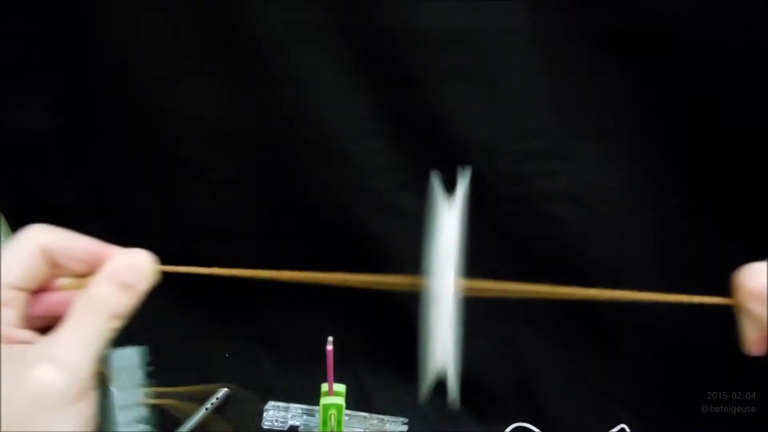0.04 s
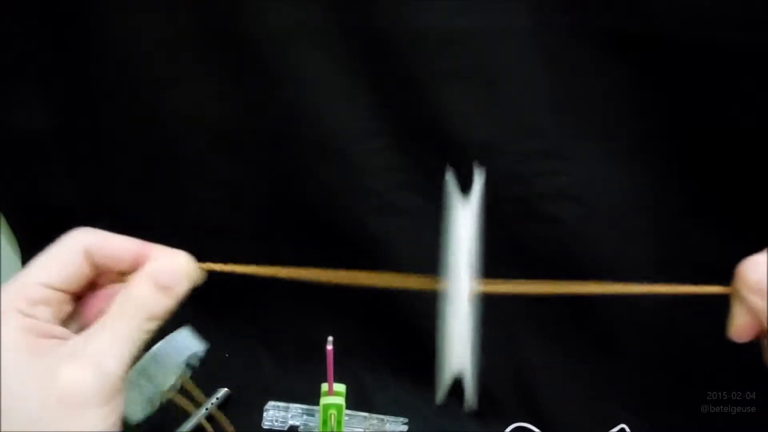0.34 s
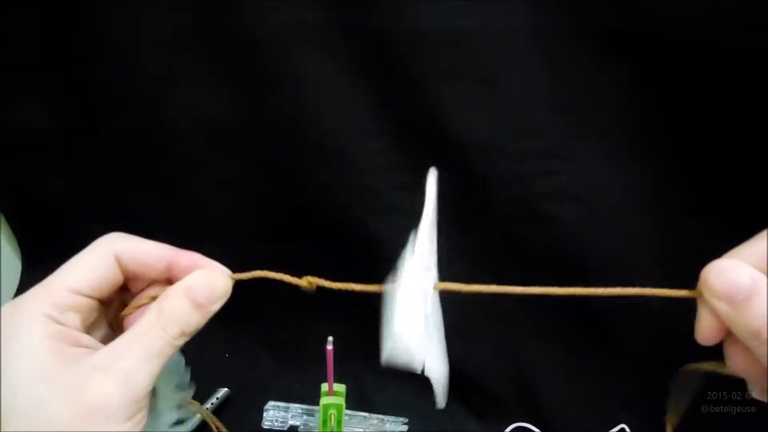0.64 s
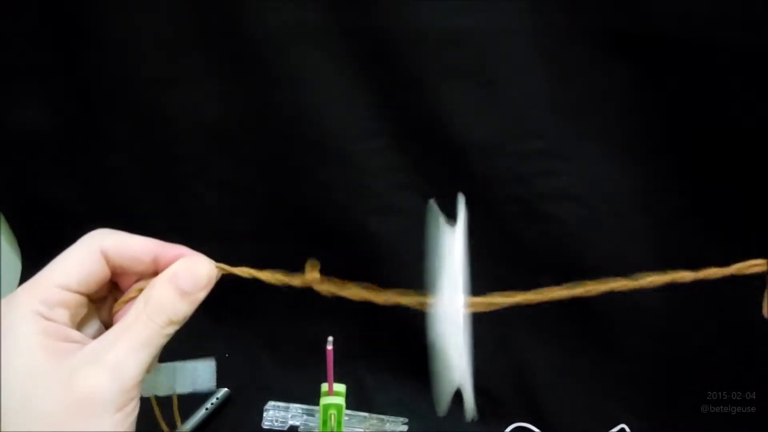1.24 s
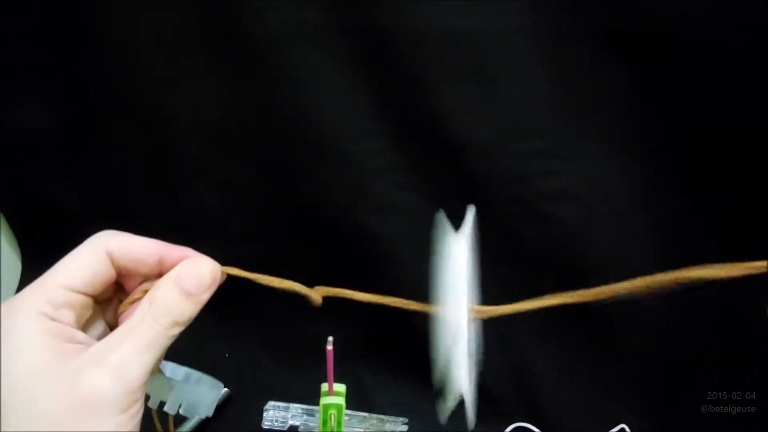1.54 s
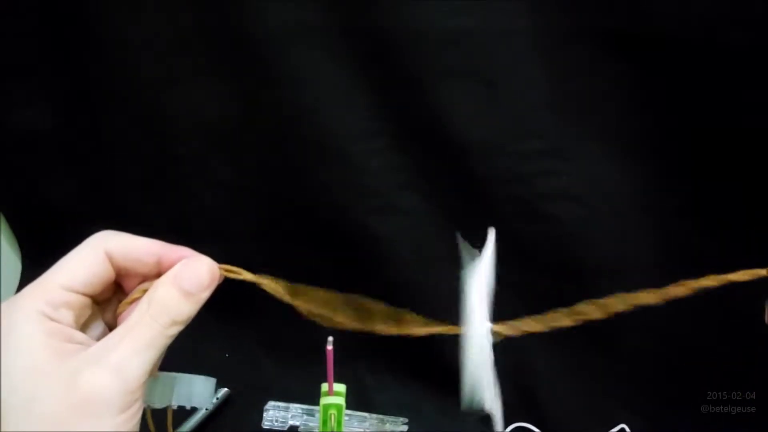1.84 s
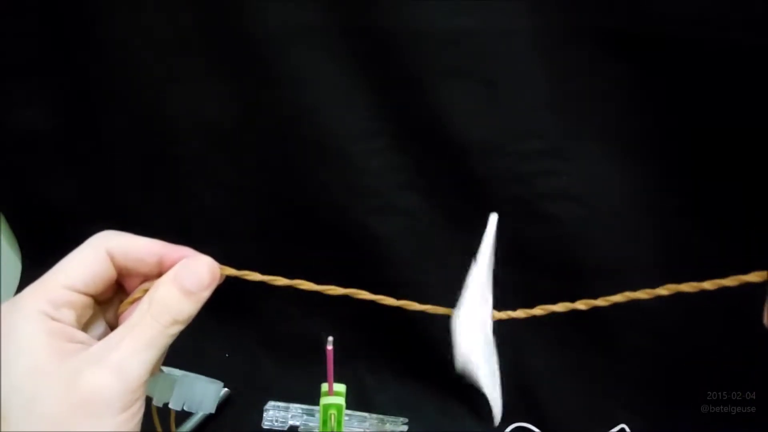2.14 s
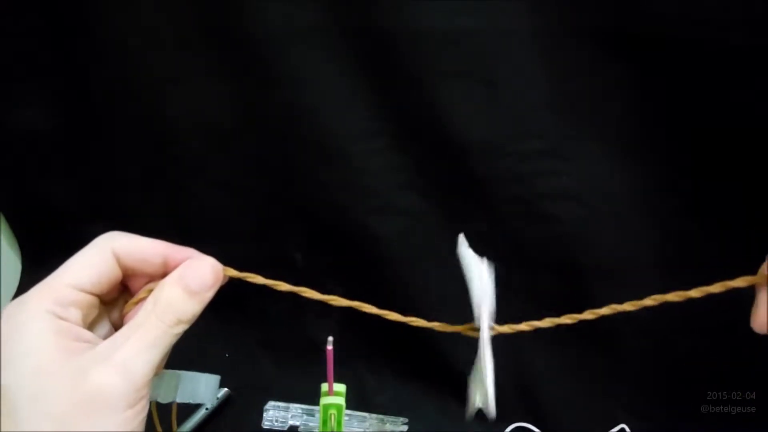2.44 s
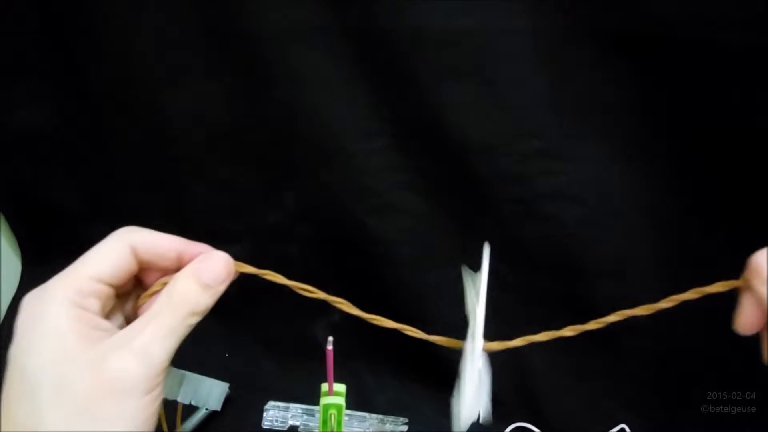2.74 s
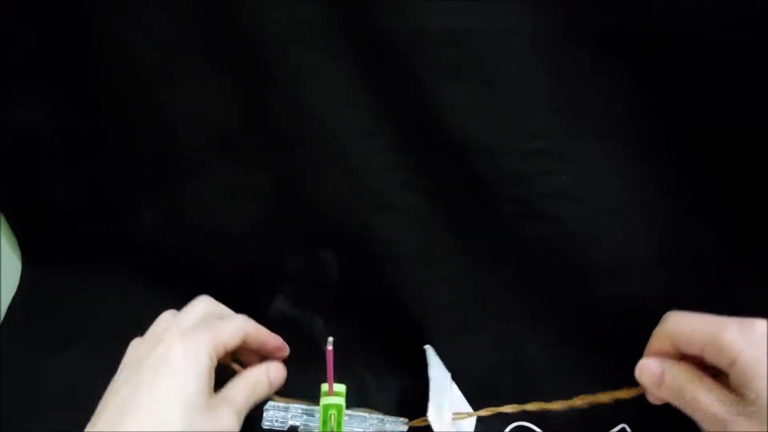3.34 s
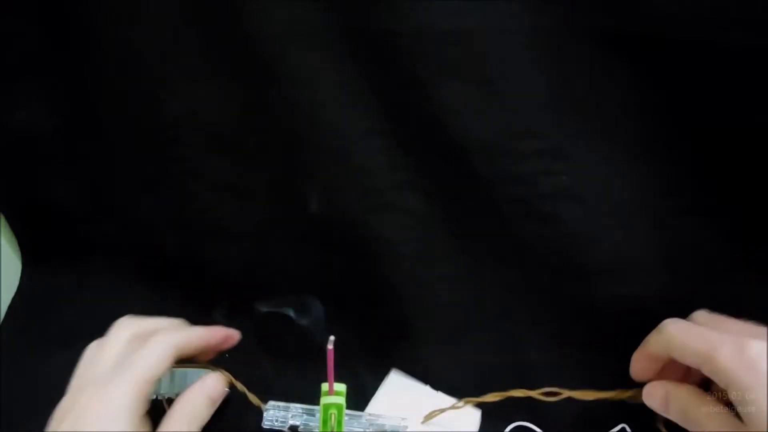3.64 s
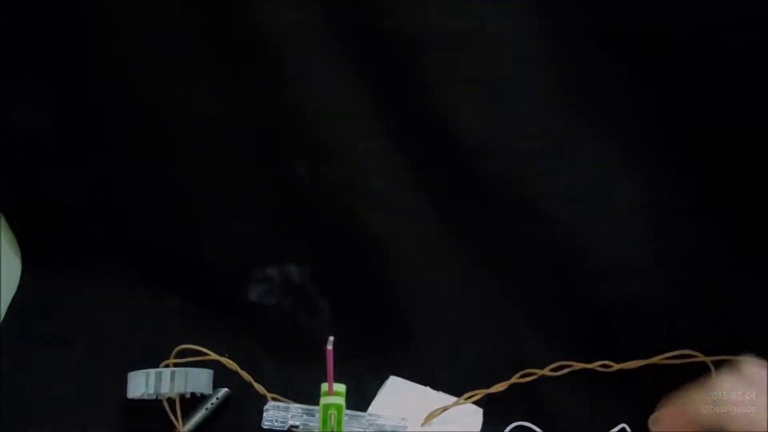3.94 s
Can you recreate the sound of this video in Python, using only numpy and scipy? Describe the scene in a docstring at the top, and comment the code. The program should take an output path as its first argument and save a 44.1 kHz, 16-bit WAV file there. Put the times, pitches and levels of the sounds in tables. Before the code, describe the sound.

Airy whoosh of a card toy spinning on a string, then light taps on a table.

```python
"""A folded card whirligig on a twisted string is pulled taut and spins up over a table in a small room.
Its edges stir the air into a fluttering whoosh while the strands of the string rub. The string kinks
with a snap and the toy winds down under soft room hiss and uneven swells of low background noise.
As the toy is lowered, its edge ticks on the table, a hand knocks, something small clicks and the
string's end taps down."""
import sys
import numpy as np
from scipy import signal
from scipy.fft import rfft, irfft
from scipy.io import wavfile
from scipy.ndimage import uniform_filter1d

SR = 44100
rng = np.random.default_rng(int(sys.argv[2]) if len(sys.argv) > 2 else 0)


def unload_audio(sound):
    """Save the sound as a 16-bit wav file, at the path given as the first command line argument."""
    columns = np.transpose(np.atleast_2d(sound))
    # keep every value between -1 and 1, then stretch to whole-number steps
    steps = np.round(np.clip(columns, -1, 1) * 32767)
    wavfile.write(sys.argv[1], SR, steps.astype(np.int16))


N = 176400
TIME_S, FREQ_HZ = np.arange(N) / SR, np.fft.rfftfreq(N, 1 / SR)
TOP_HZ = 15100


def amp(db):
    return 10 ** (np.asarray(db) / 20)


def unit_rms(x):
    return x / np.sqrt(np.mean(x ** 2))


def over_time(rows):
    """Linear interpolation, one value per sample."""
    return np.interp(TIME_S, *np.array(rows).T)


def over_hz(rows):
    """Log-frequency interpolation, one value per bin."""
    hz, value = np.array(rows).T
    return np.interp(np.log(FREQ_HZ + 1), np.log(hz), value)


def wander(rate_hz):
    """Smooth random drift, unit RMS."""
    size = max(int(SR / rate_hz), 1)
    return unit_rms(uniform_filter1d(uniform_filter1d(rng.standard_normal(N), size), size))


def pan(left_db):
    return amp(np.array([[left_db], [-left_db]]) / 2)


def stereo_noise(spectrum, correlation, peaks=()):
    """Coloured noise with resonances and a set left-right correlation, unit RMS."""
    resonance = sum(amp(db) / (1 + (2 * (FREQ_HZ - hz) / width_hz) ** 2) for hz, width_hz, db in peaks)
    gain = amp(over_hz(spectrum)) * (1 + resonance)
    alike = over_hz(correlation)
    mid, side = rfft(rng.standard_normal((2, N))) * gain * np.sqrt([1 + alike, 1 - alike])
    return unit_rms(irfft(np.array([mid + side, mid - side]), N))


# card whoosh (time [s], level [dB])
AIR_LEVEL = [(0, -45), (.04, -49.5), (.065, -60), (.14, -73.5), (.162, -47.5), (.205, -40), (.27, -36),
             (.335, -36), (.38, -38.5), (.45, -38), (.53, -41.5), (.62, -49.5), (.665, -48), (.73, -61.5),
             (.86, -62), (1.0, -91)]
# whoosh colour (frequency [Hz], gain [dB])
AIR_SPECTRUM = [(30, -28), (60, -10), (110, -9.5), (250, -14.5), (520, -8.5), (800, -2), (1250, -3.5),
                (1550, -1), (2200, -3), (2800, -5), (4500, -11.5), (8000, -17), (13000, -59)]
# whoosh resonances (centre [Hz], width [Hz], level [dB])
AIR_RESONANCES = [(172, 25, -0.5), (353, 29, 5), (1155, 37, -4), (1345, 50, 0.5), (1770, 48, -1.5),
                  (2040, 50, -3), (2240, 120, 1), (2870, 27, -10)]
# twisting string's rush (time [s], level [dB])
RUB_LEVEL = [(0, -78), (.14, -82), (.165, -53), (.205, -40.5), (.26, -36), (.335, -35.5), (.42, -38),
             (.52, -44), (.6, -49), (.67, -54), (.74, -55), (.9, -97)]
# rush colour (frequency [Hz], gain [dB])
RUB_SPECTRUM = [(300, -61), (2000, -1), (3300, -0.5), (5000, -2.5), (7500, -5.5), (9500, -11), (12000, -21),
                (13400, -29), (14200, -56)]
# toy's left-right likeness (frequency [Hz], correlation [0-1])
TOY_CORRELATION = [(100, 0.92), (600, 1), (1400, 0.58), (3000, 0.24), (7000, 0.1)]


def whirligig(top_spin_hz=57.7, db_per_speed_decade=53.5, flutter_depth=0.1):
    """The card's edges stir the air twice a turn while the string's strands rub over each other."""
    air_db = over_time(AIR_LEVEL)
    spin_hz = top_spin_hz * 10 ** ((air_db - air_db.max()) / db_per_speed_decade)
    flutter = 1 + flutter_depth * np.sin(2 * np.pi * np.cumsum(2 * spin_hz) / SR)
    gusts = amp(0.5 * wander(rate_hz=33))
    air = stereo_noise(AIR_SPECTRUM, TOY_CORRELATION, AIR_RESONANCES) * amp(air_db)
    rub = stereo_noise(RUB_SPECTRUM, TOY_CORRELATION) * amp(0.1 * wander(rate_hz=1300))
    rub = unit_rms(rub) * amp(over_time(RUB_LEVEL))
    return flutter * gusts * (air * pan(left_db=2.5) + rub * pan(left_db=0.7))


# table and wall reflections (left delay [ms], right delay [ms], level [dB])
REFLECTIONS = [(5.7, 6.2, -14.5), (9.3, 8.6, -10), (15.7, 16.9, -14)]


def early_echoes(x):
    """Near surfaces comb the sound, differently on each side."""
    comb = 1 + sum(amp(db) * np.exp(-2j * np.pi * FREQ_HZ * np.array([[left_ms], [right_ms]]) / 1000)
                   for left_ms, right_ms, db in REFLECTIONS)
    return irfft(rfft(x) * comb / np.sqrt(np.mean(np.abs(comb) ** 2)), N)


# wavering, sinking room hiss (time [s], level [dB])
ROOM_LEVEL = [(0, -51.5), (.7, -49.5), (.9, -52), (1.07, -53), (1.14, -50.5), (1.26, -52.5), (1.33, -50.5),
              (1.47, -51), (1.6, -53), (1.72, -50.7), (1.78, -54), (1.85, -51), (2.01, -53.5),
              (2.075, -49.5), (2.13, -54), (2.22, -52.5), (2.29, -49), (2.33, -52.5), (2.43, -53),
              (2.52, -49), (2.565, -52), (2.6, -49), (2.64, -53), (2.71, -51.5), (2.76, -55), (2.82, -52),
              (2.87, -56.5), (2.91, -51.5), (3.04, -54), (3.11, -52), (3.19, -56), (3.28, -53), (3.42, -54),
              (3.55, -56.5), (3.67, -58), (3.8, -55.5), (3.92, -58), (4, -58.5)]
# hiss colour (frequency [Hz], gain [dB])
ROOM_SPECTRUM = [(15, -38), (30, -4), (47, 3), (68, -11), (100, -3.5), (270, -5.5), (430, -1.5), (1500, -2),
                 (3000, -4.5), (7000, -9.5), (13300, -15.5), (14200, -27.5)]
# room modes (centre [Hz], width [Hz], level [dB])
ROOM_RESONANCES = [(48, 15, -6), (167, 12, -3.5), (206, 7.3, 7.5), (344.4, 36, 2.5), (562, 14, -3)]
# room's left-right likeness (frequency [Hz], correlation [0-1])
ROOM_CORRELATION = [(40, 0.83), (150, 0.63), (500, 0.38), (1500, 0.066), (4000, 0.027), (12000, 0.11)]


def room_tone(rumble_top_hz=110, rumble_swing=1.5, hum_hz=96.7, hum_db=-71):
    """Hiss and rumble waver together, the rumble most, over steady mains hum."""
    noise = stereo_noise(ROOM_SPECTRUM, ROOM_CORRELATION, ROOM_RESONANCES)
    lows = signal.sosfiltfilt(signal.butter(2, rumble_top_hz, fs=SR, output="sos"), noise)
    level_db = over_time(ROOM_LEVEL)
    rumble_db = level_db.mean() + rumble_swing * (level_db - level_db.mean())
    rumble = lows * amp(rumble_db + 0.9 * wander(rate_hz=20))
    hiss = (noise - lows) * amp(level_db + 0.62 * wander(rate_hz=31))
    hum = amp(hum_db) * np.sin(2 * np.pi * hum_hz * TIME_S)
    return hiss * pan(left_db=0.17) + rumble * pan(left_db=5) + hum


def reverb(x, t60_s=0.22, gap_s=0.00308, correlation=0.36, cutoff_hz=5030):
    """Dense, short, dull reflections from the table and walls."""
    age_s = np.arange(SR // 2) / SR
    decay = np.exp(-np.log(1000) * age_s / t60_s) * (age_s > gap_s)
    mid, side = rng.standard_normal((2, len(age_s))) * decay
    tail = np.sqrt(1 + correlation) * mid + np.sqrt(1 - correlation) * np.array([side, -side])
    dull = signal.lfilter(*signal.butter(1, cutoff_hz, fs=SR), x)
    return signal.fftconvolve(dull[None], tail / np.sqrt(np.sum(tail ** 2) / 2), axes=1)[:, :N]


def strike(hits, modes, spectrum, crack_db, crack_s, reverb_db):
    """Each blow: a crack of contact noise plus fading modes, duller for a softer contact, with reverb."""
    dry = np.zeros(N)
    grit = unit_rms(irfft(rfft(rng.standard_normal(N)) * amp(over_hz(spectrum)), N))
    age_s = np.arange(SR // 5) / SR
    ring = sum(amp(db) * np.exp(-np.log(1000) * age_s / t60_s) * np.sin(2 * np.pi * hz * age_s)
               for hz, db, t60_s in modes)
    for start_s, db, cutoff_hz in hits:
        i = int(start_s * SR)
        size = min(len(age_s), N - i)
        crack = amp(crack_db) * grit[i:i + size] * np.exp(-age_s[:size] / crack_s)
        lowpass = signal.butter(2, cutoff_hz, fs=SR)
        dry[i:i + size] += amp(db) * signal.lfilter(*lowpass, ring[:size] + crack)
    return (dry + amp(reverb_db) * reverb(dry)) * pan(left_db=4)


# hand thumps (time [s], level [dB], cutoff [Hz])
THUMP_HITS = [(.700, -50, 400), (3.285, -51, 400), (3.755, -53, 400), (3.892, -58, 900)]
# thump mode (frequency [Hz], level [dB], T60 [s])
THUMP_RING = [(177, -2, 0.13)]
# contact noise (frequency [Hz], gain [dB])
THUMP_SPECTRUM = [(60, -9), (200, -5), (600, 2), (3000, -15)]


def hand_thumps():
    """Soft hand contacts excite one low mode."""
    return strike(THUMP_HITS, THUMP_RING, THUMP_SPECTRUM, crack_db=-2, crack_s=0.025, reverb_db=-4)


# string snaps (time [s], level [dB], cutoff [Hz])
SNAP_HITS = [(.7298, -36, 14000), (.747, -40, 4500), (.7635, -49, 2200)]
# snap modes (frequency [Hz], level [dB], T60 [s])
SNAP_RING = [(481, -12, 0.076), (1040, -14, 0.11), (1170, -9, .18), (1355, -8.5, 0.13), (1705, -9, .2),
             (2250, -1.5, 0.069), (2400, -16, .06), (4400, -4, .03)]
# contact noise (frequency [Hz], gain [dB])
SNAP_SPECTRUM = [(150, -25), (550, 5.5), (1400, 11.5), (2500, 7), (3200, -1.5), (7000, 1.5), (10000, -9),
                 (13000, -26)]


def string_snaps():
    """The twisted string kinks in three snaps, each softer and duller."""
    return strike(SNAP_HITS, SNAP_RING, SNAP_SPECTRUM, crack_db=-4, crack_s=0.014, reverb_db=-4.5)


# Gaussian swells of background noise (centre [s], level [dB], sigma [s])
LOW_SWELLS = [(1.38, -61.5, 0.096), (1.65, -63, 0.044), (1.84, -61, 0.017), (2.26, -62.5, 0.042),
              (2.52, -60.5, 0.073), (2.71, -64, 0.021), (3.11, -60, 0.033)]
# swell colour (frequency [Hz], gain [dB])
SWELL_SPECTRUM = [(60, -12), (130, -1), (200, -0.5), (260, -9), (350, 2), (480, -8), (700, -13),
                  (1500, -25)]


def low_swells():
    """Low background noise rises and falls in soft, uneven swells."""
    swells = sum(amp(db) * np.exp(-((TIME_S - centre_s) / sigma_s) ** 2 / 2)
                 for centre_s, db, sigma_s in LOW_SWELLS)
    noise = stereo_noise(SWELL_SPECTRUM, ROOM_CORRELATION) * amp(wander(rate_hz=80))
    return unit_rms(noise) * swells


# card-edge ticks (time [s], level [dB], cutoff [Hz])
TICK_HITS = [(3.2362, -34, 13000), (3.2528, -31.5, 6000), (3.2772, -42, 6000), (3.2893, -46, 6000)]
# tick modes (frequency [Hz], level [dB], T60 [s])
TICK_RING = [(3800, -15, 0.0047), (4480, -3, 0.0072), (5100, -11, 0.0044)]
# contact noise (frequency [Hz], gain [dB])
TICK_SPECTRUM = [(200, -10), (1000, 1.5), (2600, 0), (3400, 0), (5200, 5.5), (6200, -8), (9000, -2),
                 (13000, -17)]


def card_ticks():
    """The card's edge meets the table; its high modes die within milliseconds."""
    return strike(TICK_HITS, TICK_RING, TICK_SPECTRUM, crack_db=-6.5, crack_s=0.0026, reverb_db=1.5)


# knock and rattle (time [s], level [dB], cutoff [Hz])
KNOCK_HITS = [(3.3568, -43.5, 6000), (3.3617, -48, 6000), (3.369, -51, 4000), (3.385, -49, 1200),
              (3.393, -50.5, 1100), (3.4208, -55, 3000)]
# knock modes (frequency [Hz], level [dB], T60 [s])
KNOCK_RING = [(580, -14, 0.07), (656, 2, 0.074), (745, -5, 0.081), (933, -10, .055), (1073, -6.5, 0.069)]
# contact noise (frequency [Hz], gain [dB])
KNOCK_SPECTRUM = [(150, -30), (450, 0), (1000, 6), (1700, -5), (5000, -11), (12000, -30)]


def table_knock():
    """A hand knocks dully on the table; a rattle follows."""
    return strike(KNOCK_HITS, KNOCK_RING, KNOCK_SPECTRUM, crack_db=-7.5, crack_s=0.009, reverb_db=-6.5)


# string-end taps (time [s], level [dB], cutoff [Hz])
TAP_HITS = [(3.721, -46, 1400), (3.740, -49.5, 1400), (3.771, -48, 2500), (3.780, -46, 2000),
            (3.796, -42.5, 2400), (3.810, -47, 1200), (3.829, -49, 1190)]
# tap modes (frequency [Hz], level [dB], T60 [s])
TAP_RING = [(620, -12, .1), (870, -14, .088), (1130, -13, .04), (1710, -7, 0.053)]
# contact noise (frequency [Hz], gain [dB])
TAP_SPECTRUM = [(150, -31), (700, 7.5), (3000, -2), (4200, -9), (12000, -28)]


def string_taps():
    """The string's end is laid down in light taps."""
    return strike(TAP_HITS, TAP_RING, TAP_SPECTRUM, crack_db=-5.5, crack_s=0.011, reverb_db=-4)


# small-object clicks (time [s], level [dB], cutoff [Hz])
CLICK_HITS = [(3.7702, -40, 9000), (3.7785, -52, 5000), (3.7965, -53, 4000)]
# click modes (frequency [Hz], level [dB], T60 [s])
CLICK_RING = [(2410, -12.5, .09), (2940, -3.5, .022), (3080, -11, 0.02)]
# contact noise (frequency [Hz], gain [dB])
CLICK_SPECTRUM = [(300, -18), (900, 6), (3200, -1), (4500, -8), (12000, -24)]


def hard_clicks():
    """Something small and hard clicks under the hand."""
    return strike(CLICK_HITS, CLICK_RING, CLICK_SPECTRUM, crack_db=-7, crack_s=0.0049, reverb_db=-1)


def scene():
    """Spinning toy, room and handling, in stereo."""
    return (early_echoes(whirligig()) + room_tone() + hand_thumps() + string_snaps() + low_swells()
            + card_ticks() + table_knock() + string_taps() + hard_clicks())


def record(dry):
    """Steep low-pass at TOP_HZ."""
    return signal.sosfilt(signal.ellip(10, .2, 70, TOP_HZ, fs=SR, output="sos"), dry)


dry = scene()
out = record(dry)
unload_audio(out)
```